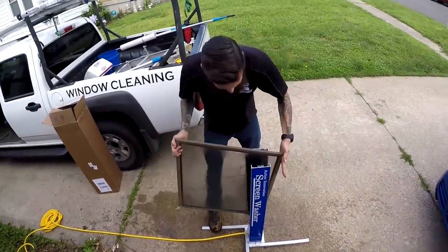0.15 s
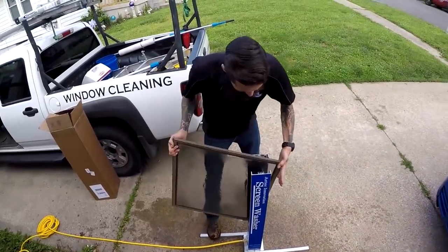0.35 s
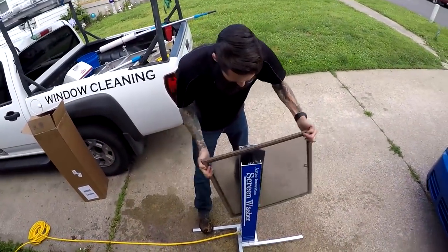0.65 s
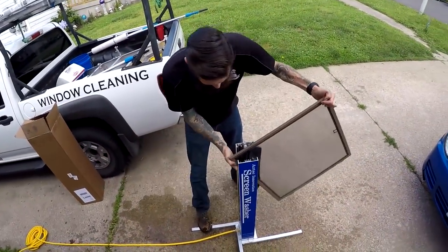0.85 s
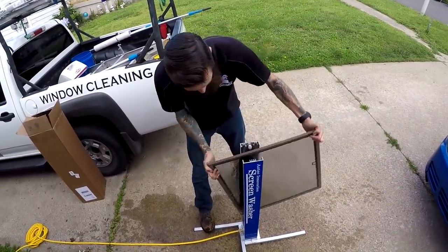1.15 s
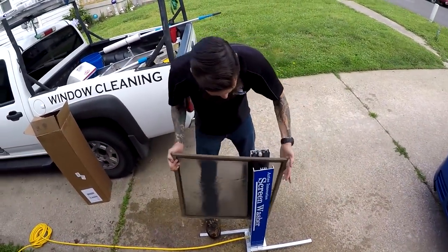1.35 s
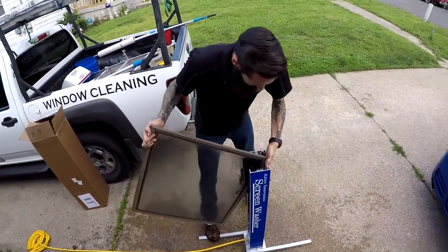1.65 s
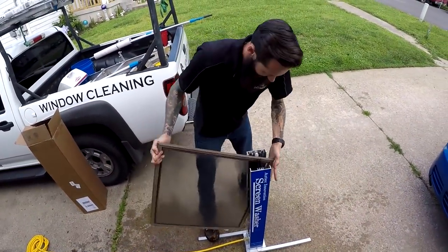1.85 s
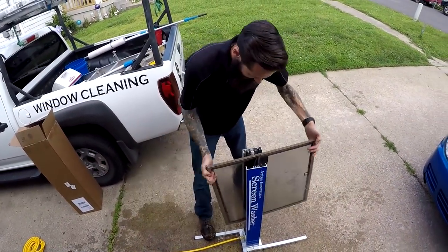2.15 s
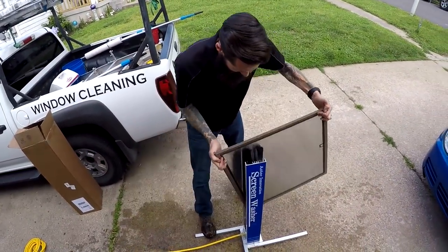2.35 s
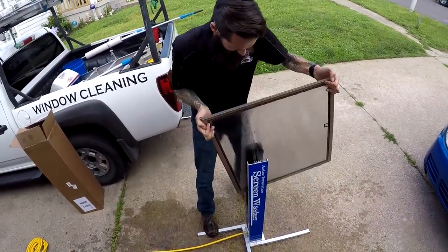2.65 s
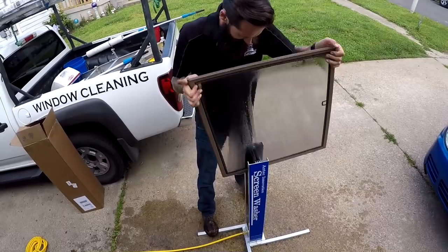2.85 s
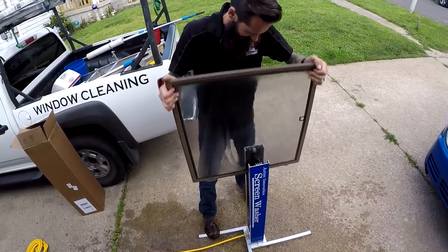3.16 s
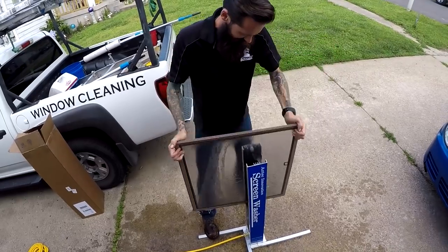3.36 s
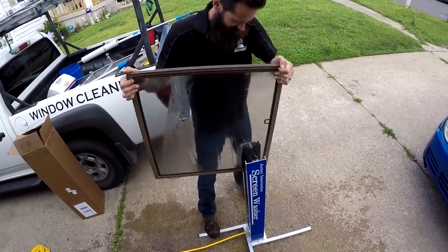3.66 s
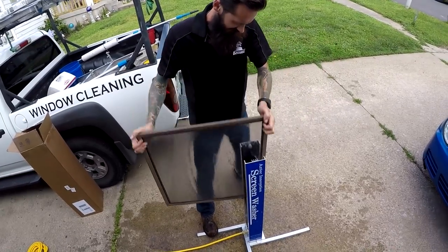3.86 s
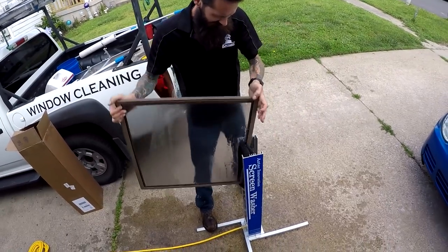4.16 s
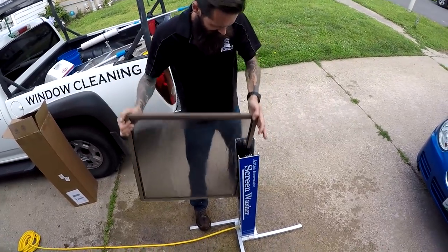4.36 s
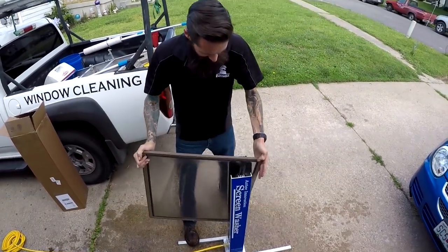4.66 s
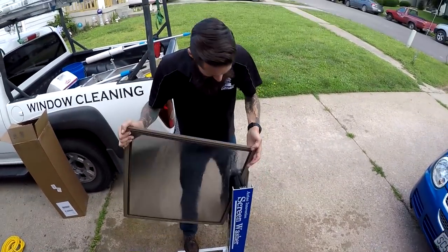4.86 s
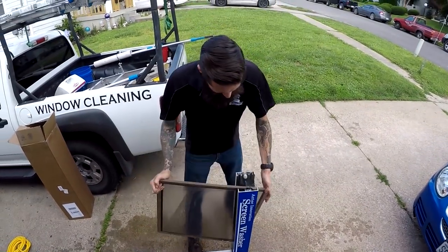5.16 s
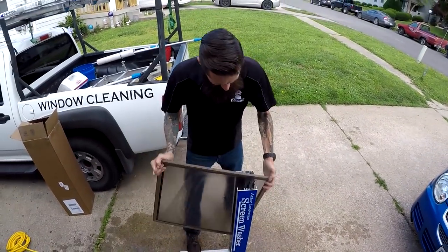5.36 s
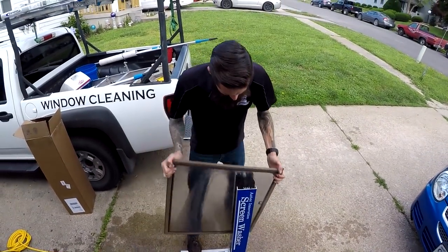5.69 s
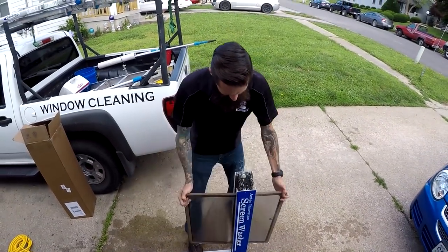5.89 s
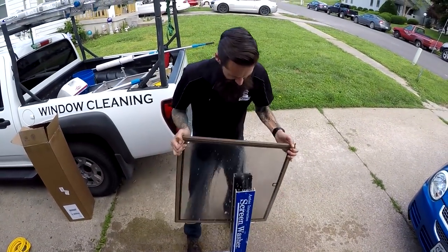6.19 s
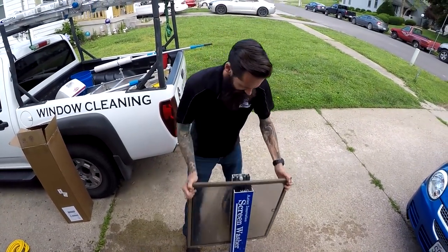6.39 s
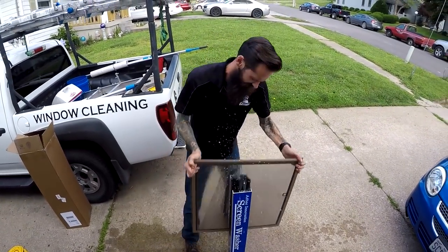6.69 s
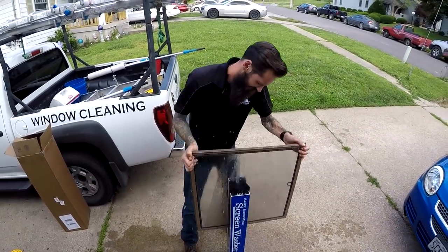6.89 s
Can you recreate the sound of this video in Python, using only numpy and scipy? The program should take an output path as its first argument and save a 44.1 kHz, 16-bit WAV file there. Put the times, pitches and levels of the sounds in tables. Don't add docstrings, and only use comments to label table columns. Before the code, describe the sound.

Outdoors, wet bristles hiss over an insect screen in rhythmic strokes that quicken, with hollow metal frame knocks and thuds over faint street hum and spray.

```python
import sys
import numpy as np
from scipy import signal
from scipy.fft import rfft, irfft, next_fast_len
from scipy.io import wavfile
from scipy.ndimage import uniform_filter1d

SR = 44100
rng = np.random.default_rng(int(sys.argv[2]) if len(sys.argv) > 2 else 0)


def wrap_up_sound(samples):
    columns = np.atleast_2d(samples).T
    tamed = np.clip(columns, -1, 1)
    steps = np.round(tamed * 32767).astype(np.int16)
    wavfile.write(sys.argv[1], SR, steps)


def linear_from_db(decibels):
    return 10 ** (np.asarray(decibels, float) / 20)


N = 310023

# f/Hz, level/dB (per Hz)
STREET_COLOUR = [(65, -44), (110, 3), (192, 0), (557, -11.5), (657, -11.5), (1350, -11.5), (1690, -11),
                 (2550, -9), (2830, -12), (3070, -13), (3260, -6), (8390, -19.5), (14900, -24)]
STREET_DB = -49.5
# t/s, level/dB
TRAFFIC_SWELL = [(0.0, -49), (0.13, -47), (0.35, -49), (0.58, -53), (0.7, -54), (1.13, -49), (1.37, -46.5),
                 (2.06, -50), (2.54, -46.5), (2.86, -55), (3.56, -47.5), (3.89, -54), (5.05, -49),
                 (5.56, -53), (6.07, -47), (7.03, -50.5)]

# start t/s, fastest t/s, end t/s, hiss level/dB, drone level over hiss/dB
STROKES = [(-0.229, 0.15, 0.34, -26, -0.9), (0.252, 0.434, 0.529, -34.5, -26),
           (0.469, 0.67, 1.048, -25.5, -2.0), (1.052, 1.32, 1.643, -25.5, -1.9),
           (1.525, 1.668, 1.737, -34.5, -3), (1.859, 2.17, 2.49, -26, -1.0),
           (2.393, 2.467, 2.78, -33, -3.5), (2.403, 2.779, 3.19, -31, -7),
           (3.155, 3.387, 3.454, -24.5, -5.5), (3.488, 3.584, 3.793, -25.0, -3.5),
           (3.798, 3.919, 4.049, -23, -7), (4.058, 4.19, 4.337, -30, -5), (4.38, 4.457, 4.72, -29, -9),
           (4.654, 4.842, 5.015, -31, -4.5), (5.03, 5.11, 5.32, -29, -7),
           (5.393, 5.473, 5.665, -25.5, -6.5), (5.693, 5.8, 5.997, -23.5, -4),
           (5.986, 6.114, 6.347, -24.5, -4.5), (6.336, 6.465, 6.603, -23, -5.5),
           (6.619, 6.76, 6.93, -22.5, -7.0), (6.968, 7.08, 7.3, -23, -9.5)]
# t/s, tilt/(dB per octave), fizz level over hiss/dB
PRESSURE = [(0, 0.0, -17), (.7, -2, -16), (1.3, -2, -15), (2.2, -1, -14.5), (2.8, 0, -11.5),
            (3.35, 1, -12.5), (3.9, -0.5, -14), (4.5, 2, -14), (5.1, 1.5, -13), (5.8, 2, -14),
            (6.45, 0.5, -15), (7.03, 2.5, -15)]
# f/Hz, level/dB (per Hz)
BRISTLE_COLOUR = [(1410, -7), (2400, -16), (2640, -5), (2860, -6.5), (3210, -5), (3680, 0), (4600, 0),
                  (5030, -3), (6380, -8.5), (8000, -35.5), (10400, -75), (17600, -120)]
# f/Hz, level/dB (per Hz)
DRONE_COLOUR = [(290, -50), (500, -19.5), (680, -18), (750, -22), (871, -10), (1360, -2), (1590, -9.5),
                (1710, -5.5), (2260, -3), (3000, -14.5), (3900, -42), (6600, -120)]
# f/Hz, level/dB (per Hz)
FIZZ_COLOUR = [(4120, -3), (7000, 0), (9130, -7.5), (9890, -7), (11000, -14), (13100, -13), (14900, -22)]
HISS_REST_DB, DRONE_REST_DB, FIZZ_REST_DB = -39.5, -46, -54
HISS_LAW, DRONE_LAW, FIZZ_LAW = 1.67, 1.81, 1.89
FLATTEN = 0.83
RIDGE_HZ, RIDGE_RISE_HZ_PER_S = 1580, 41

# t/s, level/dB
THUDS = [
    (0.053, -31),
    (1.12, -36),
    (3.517, -31.5),
    (4.714, -24),
    (4.835, -23.5),
    (4.962, -33.5),
    (5.408, -34.5),
]
# f/Hz, level/dB, time to fall 60 dB/s
THUD_MODES = [(385, 1.5, 0.042), (464, 3.5, 0.032), (560, 0, 0.032), (666, 3, .03), (784, 2, 0.026),
              (903, 5.5, .03), (1116, 4.5, 0.029), (1380, 2, .05), (1460, -10, .04)]
# t/s, blow level/dB, tilt/(dB per octave), bright tick level/dB
KNOCKS = [(0.0551, -9.5, 0, -27), (0.1922, -14, -10, -23), (0.3557, -20.5, -6, -24), (1.122, -20, -2, -12),
          (1.1488, -8.5, 5.5, -14), (1.2987, -13.5, -14, -25), (1.749, -16, -1, -9),
          (1.7823, -8.5, -2.5, -10), (2.6325, -7, 0, -16), (2.7245, -18.5, 1, -21), (3.48, -20, 0.0, -17),
          (3.5173, -26, -4, -10), (3.6748, -15, 3, -15), (4.231, -6, 5, -30), (4.6727, -20, 7, -16),
          (4.7172, -14.5, 3, 0), (4.7919, -8.5, 2, -13), (4.8378, -19, -2, -5), (4.895, -18, -8, -16),
          (4.955, -8.5, 4.5, -15), (4.9972, -25.5, -6, -19), (5.015, -28, -11, -15), (5.4096, -26, -6, -10),
          (5.568, -19.5, -8, -15), (5.6718, -24, -2, -18), (6.2798, -5.5, 6.5, -30),
          (6.333, -24.5, -3, -12), (6.759, -33, 0.0, -8), (6.8475, -13.5, -3, 0.5), (6.95, -27.5, -5, -9)]
# f/Hz, level/dB, time to fall 60 dB/s
FRAME_MODES = [(1360, -3.5, 0.044), (1693, 2, 0.03), (1850, 3.5, 0.019), (2137, 2, 0.018),
               (2460, -5.5, 0.013), (2580, -12.5, 0.072), (2680, -3, 0.018), (2970, -3, 0.015),
               (3232, -3.5, 0.026), (3607, -14.5, 0.03), (3607, -4.5, 0.016)]
# f/Hz, level/dB, time to fall 60 dB/s
TICK_MODES = [(4090, 6.5, 0.024), (4550, 15, 0.02), (5090, -15, .015), (5440, 8, 0.015), (6200, -7, .012),
              (7000, 3, 0.034), (7580, -11, .012)]
KNOCK_CHATTER_S, THUD_CHATTER_S = 0.0054, .011
FRAME_TUNE = 0.97
CRACK_DB, CRACK_T60_S = -12, 0.047
YARD_DB = -7.5

# start t/s, length/s, thread rate at the ends f/Hz, at full speed f/Hz, level/dB
WHISTLES = [
    (.555, .3, 720, 1560, -30.5),
    (2.095, .23, 1230, 1300, -29.5),
    (3.29, .15, 1090, 1330, -32.5),
    (3.9, .08, 1150, 1260, -36),
]
SING_TOP_SHARE, SING_FADE_DB = .44, -14
THROB_HZ, THROB_DB, THROB_START_S, WAVER = 14.5, 1.8, .03, .02

# t/s, level/dB, f/Hz, rise/s, time to fall 60 dB/s
BUMPS = [
    (.9, -30, 633, 0.017, 0.18),
    (1.46, -32.5, 664, 0.012, 0.13),
    (1.77, -37, 545, 0.0077, 0.25),
    (2.047, -22.5, 181, 0.00061, 0.023),
    (2.431, -37, 338, .003, 0.076),
    (3.561, -27, 164, 0.0027, 0.035),
    (4.14, -34, 560, 0.0041, 0.1),
    (5.284, -25.5, 186, 0.0014, 0.027),
    (6.116, -31, 363, 0.0045, 0.041),
    (6.739, -30, 385, 0.0034, 0.069),
]

# f/Hz, likeness (0-1), left lead/rad, left over right level/dB
PORTS = [(90, .3, 0, -.6), (400, .6, -.4, -2), (800, .2, -.3, -4), (1200, .7, 1.2, -10),
         (1600, .93, 1.3, -2.5), (2200, .88, .95, 0), (2550, .85, 0, -.5), (3900, .99, 0, 0),
         (5200, .72, -.5, 1.5), (7500, .35, -.3, 2), (8500, .45, 0, -4.5), (10200, .15, 2.2, -14),
         (11300, .25, -.2, -10), (13200, .66, -.15, -.5), (14300, .3, -.3, 0)]


def evened(x):
    return x / np.sqrt(np.mean(x ** 2) + 1e-20)


def smooth_luck(size, *widths):
    luck = rng.standard_normal(size)
    for axis, width in enumerate(widths):
        luck = uniform_filter1d(luck, width, axis)
    return evened(luck)


def soft_start(t, rise):
    return 1 - np.exp(-(t / rise) ** 2)


def high_pass(x, order, hz):
    return signal.sosfilt(signal.butter(order, hz, "high", fs=SR, output="sos"), x)


def read(points, hz, column=1):
    rows = np.transpose(points)
    return np.interp(np.log(hz + 1), np.log(rows[0] + 1), rows[column])


def add(mix, s, sound):
    part = mix[round(s * SR):][:len(sound)]
    part += sound[:len(part)]


def pair(ticks_per_s, spread_db, size):
    ticks = rng.standard_normal((N, 2))
    ticks *= linear_from_db(spread_db * np.minimum(rng.exponential(1, (N, 1)), 5))
    ticks *= rng.random((N, 1)) < ticks_per_s / SR
    hz, t, (a, b) = signal.stft(evened(ticks.T), SR, nperseg=size, noverlap=size * 3 // 4)
    same = np.clip(read(PORTS, hz), 0, 1)[:, None]
    return hz, t, np.array([a, same * a + np.sqrt(1 - same ** 2) * b])


def unpair(z, size):
    return signal.istft(z, SR, nperseg=size, noverlap=size * 3 // 4)[1][:, :N]


def band_scaled(gain, hz, lo_hz, hi_hz):
    inside = (hz > lo_hz) & (hz < hi_hz)
    return (gain / np.sqrt(np.sum(gain[inside] ** 2) / len(hz)))[:, None]


def shape(points, hz, lo_hz, hi_hz):
    gain = linear_from_db(read(points, hz)) * (hz > points[0][0]) * (hz < points[-1][0])
    return band_scaled(gain, hz, lo_hz, hi_hz)


def street():
    hz, t, z = pair(ticks_per_s=SR, spread_db=-1, size=2048)
    patches = smooth_luck(z.shape[:0:-1], 10, 5).T
    gain = band_scaled(linear_from_db(read(STREET_COLOUR, hz)), hz, 120, 900)
    middle = np.exp(-(np.log((hz[:, None] + 1) / 520) / 0.62) ** 2)
    swell_db = np.interp(t, *np.transpose(TRAFFIC_SWELL)) + 56
    z = z * gain * linear_from_db(STREET_DB + 2.14 * patches + middle * swell_db)
    return unpair(z, 2048)


def arch(t, start, top, end):
    rising = (t - start) / (top - start)
    falling = (end - t) / (end - top)
    return np.sin(np.pi / 2 * np.clip(np.minimum(rising, falling), 0, 1))


def rubbed(t, db, law, rest_db):
    start, top, end = np.transpose(STROKES)[:3, :, None]
    speed_gain = np.tanh(FLATTEN * arch(t, start, top, end) ** law) / np.tanh(FLATTEN)
    moving = linear_from_db(np.reshape(db, (-1, 1))) * speed_gain
    return np.sqrt((moving ** 2).sum(0) + linear_from_db(rest_db) ** 2)


def scrubbing():
    hz, t, z = pair(ticks_per_s=20000, spread_db=1.4, size=256)
    top, _, hiss_db, drone_db = np.transpose(STROKES)[1:]
    s, tilt_db, wet_db = np.transpose(PRESSURE)
    hiss = rubbed(t, hiss_db, HISS_LAW, HISS_REST_DB)
    drone = rubbed(t, hiss_db + drone_db, DRONE_LAW, DRONE_REST_DB)
    fizz = rubbed(t, hiss_db + np.interp(top, s, wet_db), FIZZ_LAW, FIZZ_REST_DB)
    threads_hz = RIDGE_HZ + RIDGE_RISE_HZ_PER_S * t
    ridge = np.exp(-(np.log((hz[:, None] + 1) / threads_hz) / 0.12) ** 2)
    bright = linear_from_db(np.interp(t, s, tilt_db) * np.log2((hz[:, None] + 1) / 4500))
    power = (hiss * bright * shape(BRISTLE_COLOUR, hz, 3500, 7000)) ** 2
    power += (drone * shape(DRONE_COLOUR, hz, 900, 2600)) ** 2 * (.6 + 1.8 * ridge)
    power += (fizz * shape(FIZZ_COLOUR, hz, 8000, 14000)) ** 2
    tufts = smooth_luck(power.T.shape, 25, 3).T
    judder = smooth_luck(len(t), 40)
    return unpair(z * np.sqrt(power) * linear_from_db(1.15 * tufts + 0.74 * judder), 256)


def ring(modes, place, tilt_db, chatter, luck):
    t = np.arange(SR // 8) / SR
    after = np.maximum(t - chatter, 0)
    rattle = 1 + .5 * np.interp(t, np.arange(12) * 0.001218, np.append(luck[-11:], 0))
    modal = np.zeros(len(t))
    for (hz, db, t60), u, v in zip(modes, luck, luck[11:]):
        level_db = db + tilt_db * np.log2(max(hz, 1700) / 2000) + 1.6 * u - 60 * after / t60
        modal += linear_from_db(level_db) * np.sin(2 * np.pi * hz * place * (1 + 0.019 * v) * t + 4 * v)
    modal *= rattle * soft_start(t, 0.0014)
    return modal / abs(modal).max()


def thud(s, db, luck):
    return s - .002, linear_from_db(db) * ring(THUD_MODES, 1, 0, THUD_CHATTER_S, luck)


def knock(row, luck, grit):
    s, db, tilt_db, tick_db = row
    t = np.arange(len(grit)) / SR
    sound = ring(FRAME_MODES, FRAME_TUNE, tilt_db, KNOCK_CHATTER_S, luck)
    sound += linear_from_db(tick_db) * ring(TICK_MODES, FRAME_TUNE, 0, KNOCK_CHATTER_S, luck[5:])
    snap = signal.sosfilt(signal.butter(2, 4500, fs=SR, output="sos"), grit) * soft_start(t, .001)
    add(sound, 0, linear_from_db(CRACK_DB + .5 * tilt_db - 60 * t / CRACK_T60_S) * snap)
    return s - .002, linear_from_db(db) * high_pass(sound, 4, 1100)


def yard(x):
    t = np.arange(4000) / SR
    taps = rng.standard_normal((2, 4000)) * (rng.random((2, 4000)) < .05)
    taps *= linear_from_db(-60 * t / 0.037) * (t > .003)
    return signal.fftconvolve(x[None], taps / np.linalg.norm(taps[0]), axes=1)[:, :N]


def whistle(start, length, ends_hz, top_hz, db):
    t = np.arange(0, length, 1 / SR)
    speed = arch(t, 0, SING_TOP_SHARE * length, length)
    throb = np.cos(2 * np.pi * THROB_HZ * (t - THROB_START_S))
    pitch_hz = (ends_hz + (top_hz - ends_hz) * speed) * (1 + WAVER * throb)
    turns = np.cumsum(pitch_hz) / SR
    r = np.exp(-np.pi * 105 / SR)
    slip = (rng.standard_normal((SR // 2, 2)) @ np.array([1, 1j]))[:len(t)]
    for _ in range(2):
        slip = signal.lfilter([1 - r], [1, -r], slip)
    slip = slip / np.sqrt(np.mean(abs(slip) ** 2))
    wave = ((.8 + slip) * np.exp(2j * np.pi * turns)).real
    level_db = db + THROB_DB * throb + SING_FADE_DB * (t / length) ** 4
    return start, linear_from_db(level_db) * evened(wave) * signal.windows.tukey(len(t), .3)


def bump(db, hz, rise, t60):
    t = np.arange(8000) / SR
    waver = smooth_luck(len(t), 500)
    tone = np.sin(2 * np.pi * np.cumsum(hz * (1 + 0.026 * waver)) / SR)
    flutter = smooth_luck(len(t), 250)
    return linear_from_db(db - 60 * t / t60 + 2.9 * flutter - 0.5) * tone * soft_start(t, rise)


def scene():
    near = np.zeros(N)
    for (s, db), luck in zip(THUDS, rng.standard_normal((len(THUDS), 40))):
        add(near, *thud(s, db, luck))
    for row, luck in zip(KNOCKS, rng.standard_normal((len(KNOCKS), 1040))):
        add(near, *knock(row, luck[:40], luck[40:]))
    for row in WHISTLES:
        add(near, *whistle(*row))
    for s, *push in BUMPS:
        add(near, s, bump(*push))
    return street() + scrubbing() + near + linear_from_db(YARD_DB) * yard(near)


def band_limit(x):
    return signal.sosfilt(signal.butter(12, 15070, fs=SR, output="sos"), x)


def record(dry):
    size = next_fast_len(N)
    hz = np.fft.rfftfreq(size, 1 / SR)
    lead = read(PORTS, hz, column=2)
    half = linear_from_db(read(PORTS, hz, column=3) / 2) * np.exp(.5j * lead)
    ports = np.array([half, 1 / half])
    ports /= np.sqrt((abs(ports) ** 2).sum(0) + 2 * read(PORTS, hz) * np.cos(lead)) / 2
    heard = irfft(rfft(dry, size) * ports, size)[:, :N]
    heard = high_pass(heard, 10, 150)
    rumble = signal.lfilter([1], [1, -.993], rng.standard_normal((3, N)))
    heard = heard + linear_from_db(-75.5) * evened(rumble[:2] + 2.0 * rumble[2])
    return band_limit(heard)


dry = scene()
out = record(dry)
wrap_up_sound(out)
```